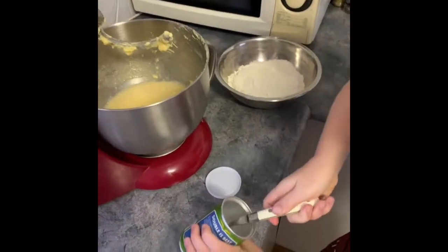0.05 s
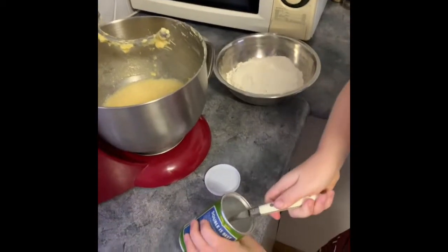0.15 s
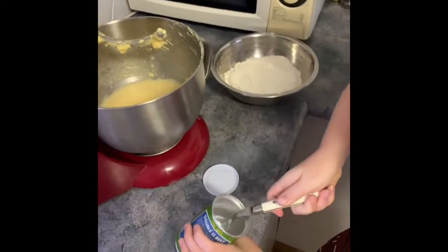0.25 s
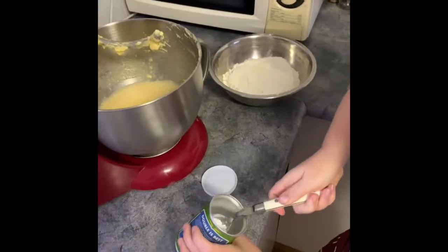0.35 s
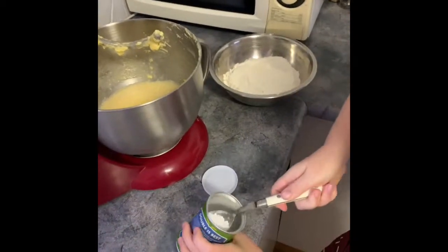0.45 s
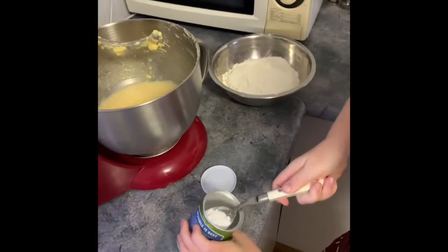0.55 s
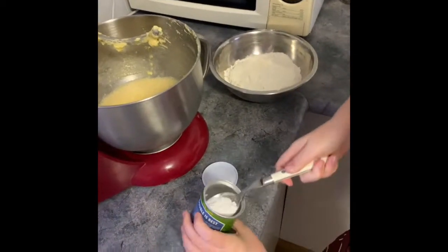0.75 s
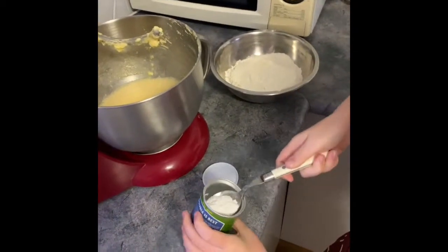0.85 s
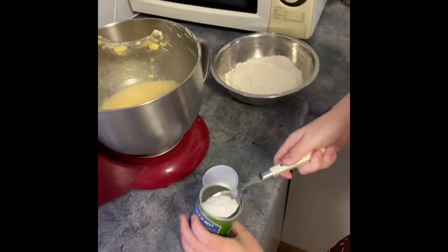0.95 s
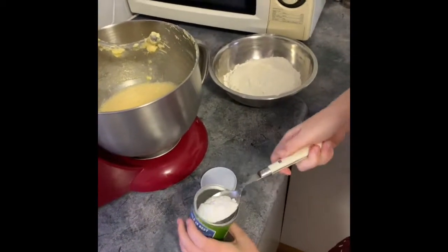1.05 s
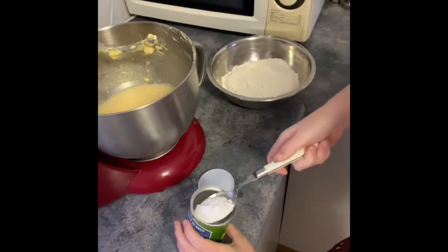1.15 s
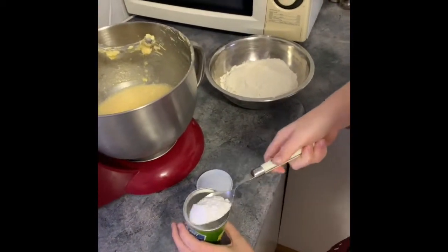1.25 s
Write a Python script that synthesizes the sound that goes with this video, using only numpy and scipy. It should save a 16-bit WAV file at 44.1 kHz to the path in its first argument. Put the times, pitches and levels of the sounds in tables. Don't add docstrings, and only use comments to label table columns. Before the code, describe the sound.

Spoon scooping powder from a tin: brief scrape, gritty crunch, hollow clunk, then light metallic rim scrapes

```python
import sys
import numpy as np
from scipy import signal
from scipy.fft import rfft, irfft
from scipy.io import wavfile
from scipy.ndimage import uniform_filter1d

SR = 44100
rng = np.random.default_rng(int(sys.argv[2]) if len(sys.argv) > 2 else 0)


def generate_wav(sig):
    pcm = np.round(np.clip(np.atleast_2d(sig).T, -1, 1) * 32767).astype(np.int16)
    wavfile.write(sys.argv[1], SR, pcm)


def gain_from_db(level_db):
    decades = np.asarray(level_db, float) / 20
    return 10 ** decades


N = 57330

# [f/Hz, level/dB]
ROOM_TONE = [(18, 6), (100, -3), (250, 3.5), (684, -4), (1280, -5), (3000, -8), (9000, -13), (16000, -22)]
ROOM_TONE_DB, SETTLE_DB = -71.5, 13
WHINE_HZ, WHINE_WIDTH_HZ, WHINE_DB = 12200, 300, -81
# [f/Hz, fall time/s]
ECHO_TIME = [(150, 0.7), (800, 0.4), (3000, 0.13), (8000, 0.2), (15000, 0.08)]
ECHO_DB = -16.5

# [start t/s, length/s, f/Hz, level/dB]
SLIDES = [(0.063, 0.062, 345, -67.5), (0.062, 0.082, 800, -62.5), (0.14, .05, 1500, -69),
          (0.5, 0.055, 445, -62), (.74, 0.066, 484, -65.5), (0.5, 0.07, 1500, -63), (.8, 0.092, 600, -76),
          (.8, 0.024, 3400, -70), (1.2, 0.18, 1440, -73.5), (1.0, 0.08, 3000, -66.5),
          (.51, 0.027, 1690, -56), (.5, 0.116, 328, -62), (1.241, 0.036, 3050, -66)]
# [start t/s, length/s, f/Hz, level/dB]
SINGS = [(.004, 0.018, 14400, -63), (.045, 0.022, 13850, -61), (.046, 0.0048, 9200, -53.5),
         (0.052, 0.015, 15300, -64), (0.146, 0.0079, 7940, -69), (0.146, 0.0084, 10570, -57),
         (0.182, 0.033, 8220, -51), (0.186, 0.047, 11350, -50.5), (0.192, 0.11, 9950, -48),
         (0.195, 0.05, 14500, -47), (0.207, 0.0038, 6750, -48), (.675, 0.105, 13500, -59),
         (.678, 0.0058, 10060, -60.5), (0.702, 0.092, 6840, -57), (.7, 0.092, 15000, -60.5),
         (0.707, 0.038, 1332, -62), (.71, 0.062, 11100, -63.5), (.733, 0.04, 9980, -54.5),
         (.734, 0.015, 6380, -60), (0.747, 0.034, 8720, -58), (0.78, 0.016, 8700, -77),
         (0.893, 0.082, 9100, -69.5), (0.926, 0.035, 14900, -61), (0.935, 0.034, 11380, -64),
         (0.939, 0.038, 9540, -63.5), (.942, 0.042, 8670, -62.5), (.943, 0.022, 6230, -61.5),
         (.945, 0.026, 14400, -70), (0.982, 0.0096, 6640, -54), (.982, 0.011, 6050, -54.5),
         (0.988, 0.0055, 11500, -62)]
SLIDE_WIDTH, SING_WIDTH = .22, .022
SING_RISE_S, SING_T60_S = .002, .045

# [f/Hz, width/Hz, level/dB]
CAVITY = [(700, 46, -8), (801, 51, 6.5), (888, 80, -15.5), (255.7, 120, -5.5), (2113, 100, -2.5),
          (7100, 300, -8)]
# [t/s, level/dB]
HOLLOW = [(.345, -48), (.36, -29.5), (.39, -42), (.43, -54), (.47, -49), (.52, -47), (.57, -53.5),
          (.612, -66), (.63, -68)]
# [t/s, level/dB, f/Hz]
COLUMN = [(.4, -60, 730), (.45, -53, 725), (.49, -52, 750), (.525, -49, 775), (.55, -50, 750),
          (.575, -49, 730), (.608, -51, 725), (.62, -64, 725), (.66, -72, 725)]
COLUMN_WIDTH_HZ, THIRD_DB = 50, -8

# [t/s, level/dB]
GRAZES = [
    [(0, -55.5), (.03, -77), (.046, -52.5), (.08, -77), (.11, -89)],
    [(.14, -70), (.149, -53), (.181, -57), (.186, -51), (.2, -44), (.222, -45.5), (.235, -37)],
    [(.655, -71), (.7, -58.5), (.735, -56.5), (.76, -57.5), (.79, -60.5), (.86, -82)],
    [(.895, -70), (.935, -64), (.943, -59.5), (.975, -60.5), (.993, -56), (1.005, -66.5), (1.1, -74),
     (1.22, -92)],
]
# [f/Hz, level/dB]
GRIT = [(150, -29.5), (400, -7.5), (1500, -7.5), (5000, -6.5), (9000, -7), (15000, -18.5)]
GRIT_TILT_DB = [-1, 9.5, -1.5, -2]

# [t/s, peak level/dB, f/Hz, time to fall 60 dB/s]
TICKS = [(.0455, -29, 13700, 0.0054), (0.0462, -33, 14200, 0.013), (0.046, -45, 8300, 0.043),
         (0.051, -31, 14700, 0.0074), (0.2, -22, 10700, 0.005), (0.2238, -26.5, 3450, 0.012),
         (0.226, -17, 6380, 0.0028), (0.2284, -34, 4000, 0.0037), (0.524, -33, 6580, 0.018),
         (0.526, -40, 5660, 0.035), (.824, -55, 15000, 0.011), (0.9423, -42, 11240, .008),
         (1.031, -53.5, 5900, 0.027), (1.063, -57, 6600, .015), (1.242, -45, 2860, 0.027),
         (1.2433, -56, 4760, 0.03), (1.248, -52.5, 6030, 0.061), (1.252, -56, 3370, 0.011),
         (1.2465, -46, 3196, 0.022), (1.258, -50.5, 2910, 0.044),
         (.393, -31, 5170, 0.011), (.432, -40, 5250, 0.018), (.435, -35, 6220, 0.014),
          (.449, -33.5, 2170, 0.015), (.4585, -43, 7100, 0.014), (.484, -52, 14500, .01),
          (.4845, -54, 11100, .008), (.489, -61.5, 13600, .02), (.4935, -49, 7100, 0.046),
          (.525, -45, 14000, 0.0059), (.525, -50, 9200, 0.019), (.535, -46, 6000, 0.018),
          (.736, -43, 6570, 0.022), (.759, -38, 9200, 0.018), (.761, -39, 7260, .012),
          (.798, -54, 6610, 0.016), (1.031, -55, 4800, .03), (1.031, -53, 7100, 0.0085),
          (.942, -49, 6200, 0.012), (.988, -41, 6260, .02), (1.081, -66, 3400, 0.012),
          (1.26, -53, 6930, 0.02), (.76, -52, 5000, 0.024)]
CRACK_DB, CRACK_T60_S, TICK_RISE_S = -4, .005, .0008

# [t/s, peak level/dB, start f/Hz, body level/dB]
KNOCKS = [
    (.1501, -30, 1900, 3),
    (.3481, -9, 1800, 0),
    (.518, -46, 1000, -1),
]
# [t/s, peak level/dB, start f/Hz, body level/dB]
BOUNCES = [(.3515, -13.5, 1220, -13), (.3535, -16.5, 1022, -15), (.3605, -23, 1136, -23),
           (.3645, -43, 1240, -8.5), (.3735, -30.5, 1300, -18.5), (.382, -24.5, 1130, 0),
           (.386, -28.5, 1060, 5.5), (.392, -25.5, 1140, -17.5), (.1555, -47, 1190, -0.5),
           (.176, -45.5, 1008, 13.5), (.187, -44.5, 1026, 6)]
# [t/s, peak level/dB, start f/Hz, body level/dB]
SOFT_KNOCKS = [(1.031, -49.5, 2000, 0.5), (1.034, -55.5, 1100, -6), (1.036, -52.5, 500, -16),
               (1.0635, -59, 1900, -21), (1.067, -56.5, 978, 4.5), (1.0735, -51, 1076, -25),
               (1.243, -54, 1500, -1), (1.248, -58, 700, 8), (1.26, -55.5, 1227, -2)]
# [f/Hz, level/dB, time to fall 60 dB/s]
BODY = [(155, -16, .13), (235, -21, .12), (340, -22, .05), (500, -22, .04), (760, -19, .16), (825, -8, .03),
        (862, -15, .16), (965, -17, .1), (1500, -24, .06)]
KNOCK_S, KNOCK_SAG = .0011, .5
RISE_S_AT_1K, RISE_LAW = .0011, 1.4

# [t/s, level/dB]
DIG = [(.221, -57), (.225, -35.5), (.229, -40.5), (.24, -28), (.25, -22.5), (.335, -29.5), (.42, -38.5),
       (.46, -48.5), (.6, -63)]
# [f/Hz, level/dB per Hz]
CRUNCH = [(90, -64), (130, -48.5), (302, -18), (736, -9), (1060, -19), (2170, -3.5), (2700, -12),
          (6840, -11), (16000, -23.5)]
# [f/Hz, width/Hz, level/dB]
CAN = [(151, 27, -13), (1500, 15, 8), (1641, 56, 4.5), (2120, 41, -7.5), (2223, 54, -1), (3300, 260, -0.5),
       (3805, 80, -14), (4413, 80, -8.5), (4915, 130, -1), (5300, 60, -9), (6100, 150, -10.5),
       (6480, 290, -6), (7050, 600, -7), (8060, 200, -8.5)]
CAN_DB = -3.5
DULLING_DB = 0.19


def evened(x):
    return x / np.sqrt(np.mean(x ** 2) + 1e-20)


def read(points, hz):
    f, value = np.transpose(points)
    return np.interp(np.log(hz + 1), np.log(f + 1), value)


def curve(points):
    s, db = np.transpose(points)
    return np.interp(np.arange(N) / SR, s, db, -140, -140)


def colour(x, points):
    hz = np.fft.rfftfreq(len(x), 1 / SR)
    return irfft(rfft(x) * gain_from_db(read(points, hz)), len(x))


def resonate(x, hz, width):
    r = np.exp(-np.pi * width / SR)
    ring = signal.lfilter([1, 0, -1], [1, -2 * r * np.cos(2 * np.pi * hz / SR), r * r], x)
    return evened(ring)


def lumps(lump_s, depth_db):
    size = int(lump_s * SR) + 1
    smooth = uniform_filter1d(uniform_filter1d(rng.standard_normal(N), size), size)
    return gain_from_db(depth_db * evened(smooth))


def slips(per_s, spread_db):
    size = rng.standard_normal(N) * gain_from_db(spread_db * np.minimum(rng.exponential(1, N), 4))
    happens = rng.random(N) < per_s / SR
    return size * happens


def rings(modes, drive, lump_s, depth_db):
    total = np.zeros(N)
    for hz, width, db in modes:
        ring = resonate(drive * lumps(lump_s, depth_db), hz, width)
        total += gain_from_db(db) * np.sqrt(width) * ring
    return evened(total)


def room_tone_and_whine():
    whine = resonate(rng.standard_normal(N), WHINE_HZ, WHINE_WIDTH_HZ)
    whine = resonate(whine, WHINE_HZ, WHINE_WIDTH_HZ)
    tone = evened(colour(rng.standard_normal(N), ROOM_TONE)) * lumps(0.0412, 1.4)
    tone_db = ROOM_TONE_DB + SETTLE_DB * (1 - np.arange(N) / N)
    return gain_from_db(tone_db) * tone + gain_from_db(WHINE_DB) * whine


def kitchen_echo(x):
    taps = np.zeros(SR // 2)
    at = np.arange(200, len(taps) - 20, 20)
    taps[at + rng.integers(0, 20, len(at))] = rng.choice([-1., 1.], len(at))
    hz, t, z = signal.stft(taps, SR, nperseg=256)
    fading = gain_from_db(-60 * t / read(ECHO_TIME, hz)[:, None])
    tail = signal.istft(z * fading, SR, nperseg=256)[1]
    return signal.fftconvolve(x, tail / np.linalg.norm(tail))[:N]


def sings_and_slides():
    out, t = np.zeros(N), np.arange(N) / SR
    for rows, width in (SINGS, SING_WIDTH), (SLIDES, SLIDE_WIDTH):
        for s, length, hz, db in rows:
            drive = slips(6000, 3) * lumps(.004, 3.5)
            rise = np.clip((t - s) / SING_RISE_S, 0, 1)
            shape = rise * gain_from_db(-60 * np.maximum(t - s - length, 0) / SING_T60_S)
            ring = shape * resonate(resonate(drive, hz, hz * width), hz, hz * width * 3)
            out += gain_from_db(db) * evened(ring) * np.sqrt(np.mean(shape ** 2))
    return out


def hollow():
    drone = rings(CAVITY, slips(6000, 2.2), .012, 2.5)
    soften = signal.butter(2, 4000, fs=SR, output="sos")
    return gain_from_db(curve(HOLLOW)) * signal.sosfilt(soften, drone)


def air_column():
    s, db, hz = np.transpose(COLUMN)
    t = np.arange(N) / SR
    out, r = np.zeros(N), np.exp(-np.pi * COLUMN_WIDTH_HZ / SR)
    third_db = THIRD_DB - 500 * np.maximum(t - .545, 0)
    for mode, mode_db in (1, np.zeros(N)), (3, third_db):
        turn = np.exp(2j * np.pi * mode * np.cumsum(np.interp(t, s, hz)) / SR)
        slow = signal.lfilter([1 - r ** mode], [1, -r ** mode], slips(6000, 2.2) / turn)
        slow = signal.lfilter([1 - r ** 6], [1, -r ** 6], slow)
        strength = np.sqrt(uniform_filter1d(abs(slow) ** 2, 900))
        steady = slow / np.sqrt(strength + 1e-9)
        out += gain_from_db(mode_db) * evened((turn * steady).real)
    return gain_from_db(curve(np.c_[s, db])) * out


def grazes():
    out = np.zeros(N)
    for path, tilt_db in zip(GRAZES, GRIT_TILT_DB):
        tone = [(f, db + tilt_db * np.log2(f / 5000)) for f, db in GRIT]
        hiss = colour(slips(16000, 2.2) * lumps(.004, 1.8), tone)
        out += gain_from_db(curve(path)) * evened(hiss)
    return out


def ticks():
    out, t = np.zeros(N + SR), np.arange(4000) / SR
    rise = np.sin(np.pi / 2 * np.minimum(t / TICK_RISE_S, 1)) ** 2
    for s, db, hz, t60 in TICKS:
        noise = rng.standard_normal(len(t))
        rough = resonate(resonate(noise, hz, hz * .08), hz, hz * .15)
        cluster = .7 * np.sin(2 * np.pi * hz * t) + .4 * rough
        crack = resonate(resonate(noise, hz, hz * .5), hz, hz * .5)
        crack = gain_from_db(CRACK_DB - 60 * t / CRACK_T60_S) * crack
        out[round(s * SR):][:len(t)] += gain_from_db(db) * rise * (gain_from_db(-60 * t / t60) * cluster + crack)
    return out[:N]


def knocks():
    out, t = np.zeros(N + SR), np.arange(SR // 2) / SR
    u = t / KNOCK_S
    body = np.zeros(len(t))
    for f, d, t60 in BODY:
        swell = (1 - np.exp(-t / RISE_S_AT_1K * (f / 1000) ** RISE_LAW)) ** 2
        body += gain_from_db(d - 60 * t / t60) * swell * np.sin(2 * np.pi * f * t)
    for s, db, hz, body_db in KNOCKS + BOUNCES + SOFT_KNOCKS:
        pitch = hz * (KNOCK_SAG + (1 - KNOCK_SAG) * np.exp(-u / 2))
        pulse = (u * np.exp(1 - u)) ** 2 * np.sin(2 * np.pi * np.cumsum(pitch) / SR)
        out[round(s * SR):][:len(t)] += gain_from_db(db) * (pulse + gain_from_db(body_db) * body)
    return out[:N]


def dig():
    drive, level_db = slips(20000, 2.43), curve(DIG)
    crunch = evened(colour(drive, CRUNCH)) + gain_from_db(CAN_DB) * rings(CAN, drive, .008, 4)
    hz, t, z = signal.stft(crunch, SR, nperseg=256)
    after_peak = np.arange(N) > level_db.argmax()
    lost_db = np.clip(level_db.max() - level_db, 0, 40) * after_peak
    lost_db = np.interp(t, np.arange(N) / SR, lost_db)
    octaves = np.maximum(np.log2(hz / 3000 + 1e-3), 0)[:, None]
    dulled = signal.istft(z * gain_from_db(-DULLING_DB * octaves ** 3 * lost_db), SR, nperseg=256)[1][:N]
    return gain_from_db(level_db) * evened(crunch).std() / crunch.std() * dulled


def scene():
    near = dig() + hollow() + air_column() + grazes() + sings_and_slides() + knocks() + ticks()
    return (near + gain_from_db(ECHO_DB) * kitchen_echo(near) + room_tone_and_whine())[None]


def band_limit(x):
    return signal.sosfilt(signal.butter(12, 16460, fs=SR, output="sos"), x)


def record(dry):
    low_cut = signal.butter(4, 125, "high", fs=SR, output="sos")
    top_cut = signal.butter(8, 15900, fs=SR, output="sos")
    heard = signal.sosfilt(low_cut, dry) + gain_from_db(-26) * dry
    heard = signal.sosfilt(top_cut, heard)
    return band_limit(heard)


dry = scene()
out = record(dry)
generate_wav(out)
```